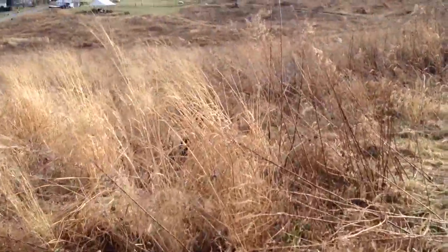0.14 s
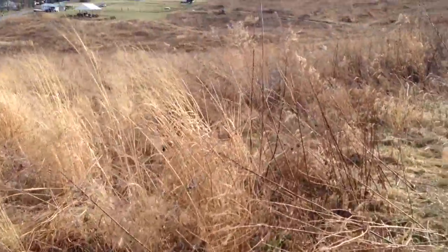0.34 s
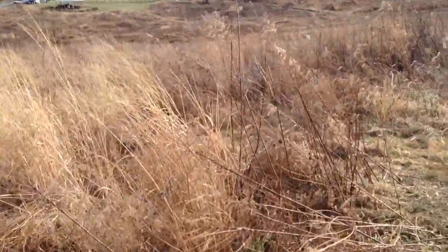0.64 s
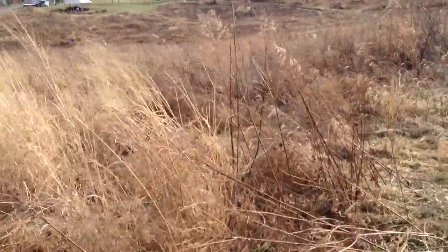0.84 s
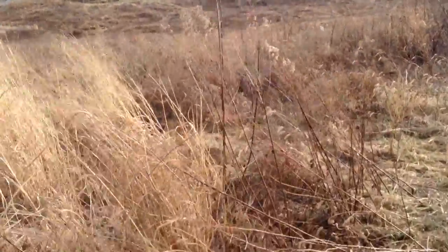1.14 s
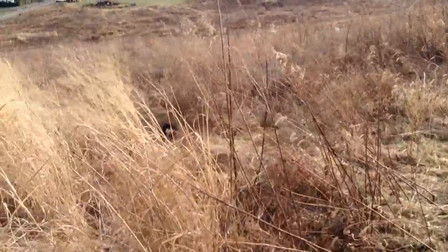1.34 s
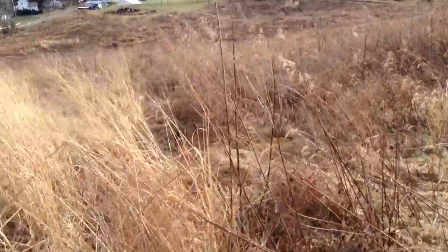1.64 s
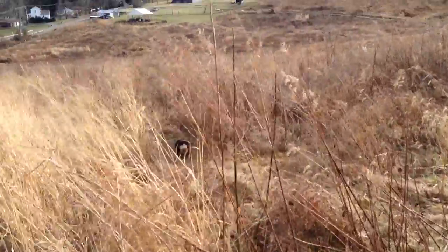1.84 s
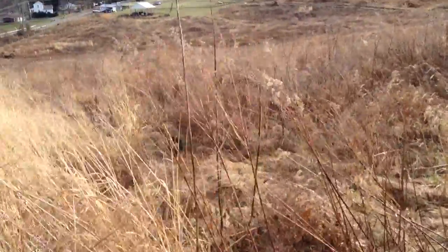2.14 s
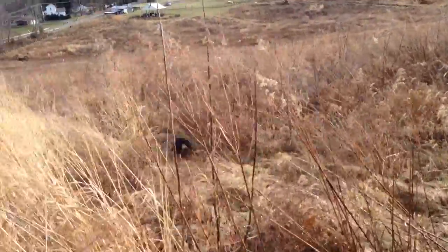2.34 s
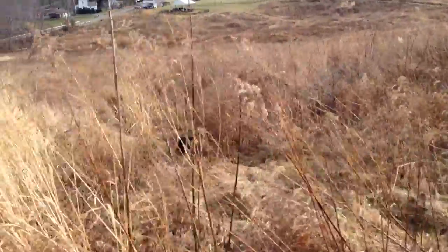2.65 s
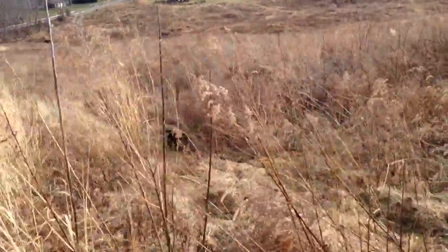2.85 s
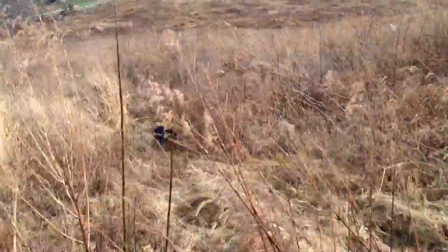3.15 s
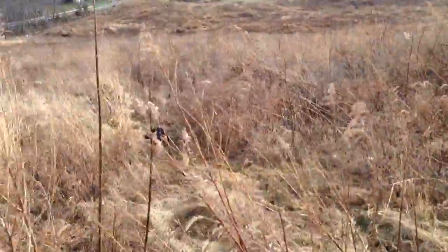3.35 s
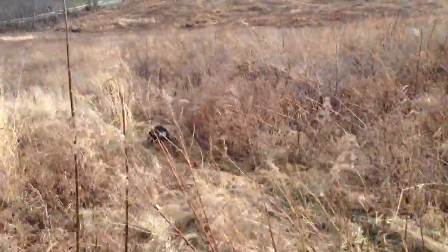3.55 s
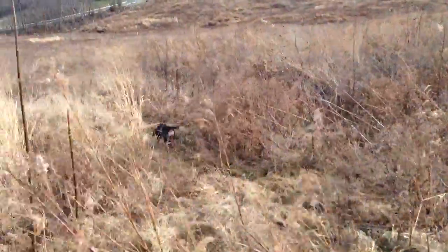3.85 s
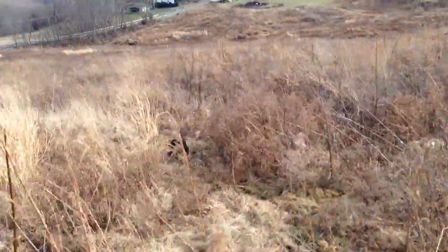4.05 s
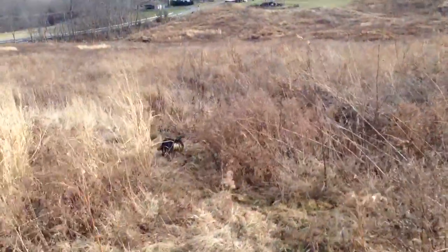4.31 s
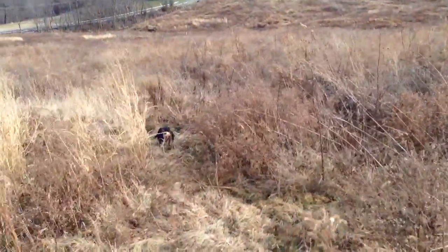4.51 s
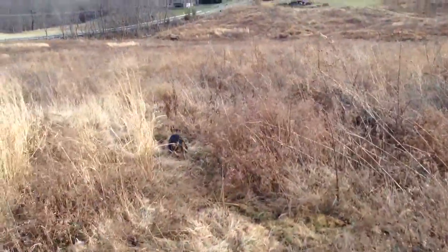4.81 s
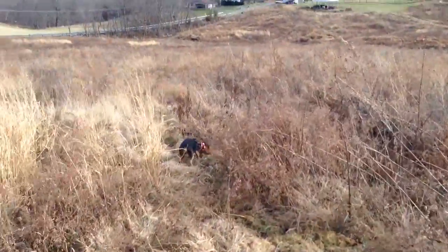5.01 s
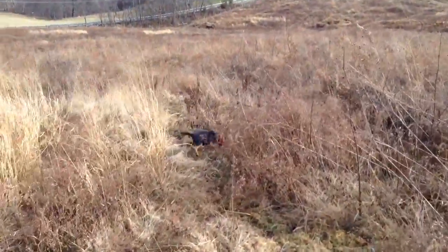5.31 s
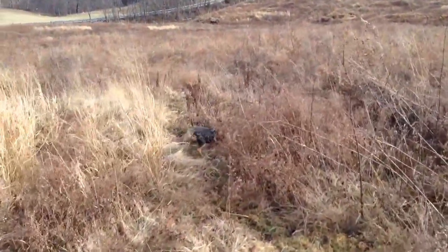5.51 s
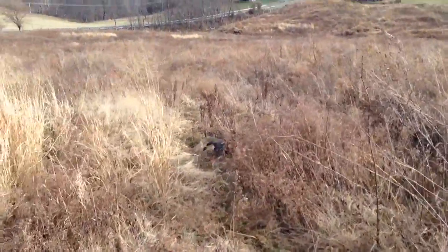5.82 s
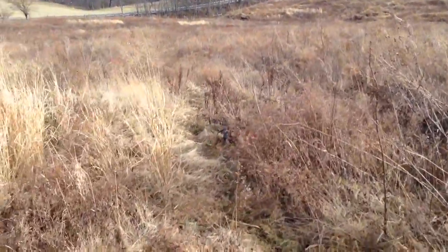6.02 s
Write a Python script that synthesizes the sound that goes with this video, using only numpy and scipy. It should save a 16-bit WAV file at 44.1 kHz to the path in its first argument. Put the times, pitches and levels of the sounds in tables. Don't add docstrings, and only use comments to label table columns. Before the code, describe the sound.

A trailing hound bays nine times, high, hoarse and abrupt, each cry rising quickly, cracking and falling off. Light metallic collar clinks run between and under the cries. Nearby strides brush through brittle grass with crisp snaps and tiny ticks, and dull paw thuds come now and then. Wind puffs low against the microphone, hardest in the gap before the fourth bay. Open, quiet field, dry acoustics.

```python
import sys
import numpy as np
from scipy import signal
from scipy.fft import rfft, irfft
from scipy.io import wavfile
from scipy.ndimage import uniform_filter1d

SR = 44100
rng = np.random.default_rng(int(sys.argv[2]) if len(sys.argv) > 2 else 0)


def level_to_linear(level):
    exponent = np.asarray(level, float) / 20
    return 10 ** exponent


def store_wav(level_fs):
    pcm = np.round(np.clip(np.atleast_2d(level_fs), -1, 1) * 32767)
    wavfile.write(sys.argv[1], SR, pcm.T.astype(np.int16))


N = 272097


def rms_one(x):
    return x / np.sqrt(np.mean(x ** 2) + 1e-20)


def in_time(rows):
    s, *columns = np.transpose(rows)
    t = np.arange(N) / SR
    return [np.interp(t, s, column) for column in columns]


def drift(rate_hz):
    r = np.exp(-2 * np.pi * rate_hz / SR)
    noise = rng.standard_normal(N + SR)
    return rms_one(signal.lfilter([1], [1, -2 * r, r * r], noise)[SR:])


def coloured(x, spectrum):
    hz, level_db = np.transpose(spectrum)
    log_hz = np.log(np.arange(N // 2 + 1) * SR / N + 1)
    gain = level_to_linear(np.interp(log_hz, np.log(hz), level_db, -90, -90))
    return rms_one(irfft(rfft(x) * gain, N))


def resonate(x, hz, width_hz):
    r = np.exp(-np.pi * width_hz / SR)
    return signal.lfilter([1, 0, -1], [1, -2 * r * np.cos(2 * np.pi * hz / SR), r * r], x)


def resonances(x, modes):
    out = 0
    for k, (hz, width_hz, level_db) in enumerate(modes):
        formant = resonate(resonate(x, hz, width_hz), hz, width_hz)
        out = out + (-1) ** k * level_to_linear(level_db) * rms_one(formant)
    return out


def grains(per_s, spread_db):
    sizes = level_to_linear(spread_db * np.minimum(rng.exponential(1, N), 4)) * rng.choice([-1, 1], N)
    return sizes * (rng.random(N) < per_s / SR)


def swells(s, level_db, rising, falling, still_db):
    crown_db = 2.5
    late_s = np.arange(N) / SR - np.c_[s]
    slope = np.where(late_s < 0, np.c_[rising], np.c_[falling])
    each_db = np.c_[level_db] + crown_db - np.hypot(slope * late_s, crown_db)
    return 10 * np.log10(level_to_linear(2 * still_db) + level_to_linear(2 * each_db).sum(axis=0))


# start_s, end_s, widest_db, closing_db_per_s, rest_db (under the folds)
BAYS = [
    (0.339, .755, -31.5, 380, -25),
    (1.015, 1.295, -40.5, 586, -35),
    (1.548, 1.749, -36.5, 211.5, -40),
    (3.106, 3.526, -32, 442.5, -40.5),
    (3.8, 4.013, -32.5, 388, -44.5),
    (4.183, 4.381, -38, 530, -46),
    (4.6, 4.787, -40, 125, -28.5),
    (5.074, 5.266, -35, 397, -44),
    (5.562, 5.749, -30.5, 202, -35.5),
]
# held_s, third_partial_db, roughness_left (share), fifth_partial_db, air_swell_s
GAPES = [(.012, -3, .1, 2, .015), (.015, 2, .2, 2, .011), (.025, -6, .2, 0, .011), (.015, -4, .4, 2, .011),
         (.02, -3, .3, -10, .005), (.04, 2, .3, -2, .011), (.012, -2, .6, 0, .018),
         (.025, 4, .35, -8, .011), (.015, -3, .75, -5, .011)]
# time_s, depth_db, half_width_s
BREAKS = [
    (.433, -12, .005),
    (1.036, -8, .004),
    (1.091, -14, .006),
    (1.694, -14, .008),
    (3.197, -14, .008),
    (3.882, -16, .006),
    (5.161, -8, .006),
]
# time_s, pitch_hz, folds_db, rasp_db
LONG_BAYS = [
    [(.372, 489.9, -24.5, -24.5), (.407, 487.3, -21, -25.5), (.44, 484, -26.5, -31),
     (.495, 517.4, -24, -35.5), (.515, 523, -23, -58.5), (.565, 530.3, -18.5, -61), (.61, 510, -20.5, -68),
     (.685, 503, -27.5, -59.5), (.7, 494, -37.5, -34.5)],
    [(1.045, 490.3, -18.5, -38.5), (1.085, 460.5, -20, -25), (1.105, 527, -17.5, -32),
     (1.165, 489, -26, -29.5), (1.185, 515, -25.5, -47), (1.215, 526, -27.5, -46.5),
     (1.232, 551, -33.5, -37.5), (1.252, 441.3, -36.5, -43)],
    [(3.125, 474.7, -32, -34), (3.151, 512.3, -19.5, -30), (3.193, 482, -16, -29), (3.245, 510.3, -21, -29),
     (3.28, 499.3, -22.5, -70), (3.33, 539, -19, -52), (3.385, 512, -18, -59), (3.45, 528.8, -19.5, -53),
     (3.487, 486, -31.5, -30)],
]
# time_s, pitch_hz, folds_db, rasp_db
SHORT_BAYS = [
    [(1.565, 442.4, -31.5, -32), (1.585, 473.3, -24.5, -26), (1.61, 472, -21.5, -22.5),
     (1.66, 531, -17.5, -28.5), (1.7, 543, -18, -40), (1.725, 539.5, -22, -45), (1.734, 496, -25.5, -32.5)],
    [(3.825, 482, -22, -49.5), (3.853, 493, -21, -37.5), (3.872, 487.5, -17, -21),
     (3.892, 551.3, -19.5, -29), (3.94, 550, -20, -31), (3.975, 502.5, -31, -40)],
    [(4.202, 452, -27.5, -33.5), (4.222, 489, -24.5, -31.5), (4.236, 500.6, -19.5, -34.5),
     (4.265, 485, -27, -39.5), (4.308, 500, -19, -46.5), (4.325, 484.4, -25.5, -30.5),
     (4.355, 455.3, -25.5, -31)],
    [(4.617, 446, -32, -35.5), (4.633, 487, -25.5, -28), (4.692, 498.2, -22, -27.5), (4.706, 503, -28, -26),
     (4.716, 521.6, -20.5, -37.5), (4.755, 525, -24.5, -42.5), (4.766, 510.7, -42, -34.5)],
    [(5.098, 475.3, -25.5, -31.5), (5.118, 519.4, -16, -39), (5.145, 499, -17, -29.5),
     (5.165, 502.7, -21, -27.5), (5.2, 506, -18, -25.5), (5.237, 469.3, -28.5, -31)],
    [(5.578, 445.6, -32, -37.5), (5.605, 513.7, -19.5, -41), (5.635, 497, -19.5, -39),
     (5.66, 507.4, -20.5, -28), (5.68, 522, -18, -25.5), (5.7, 468.6, -26.5, -32.5),
     (5.724, 453.2, -26, -35.5)],
]
# pitch_hz, level_db (over the rasp), onset_db (more at first)
LOOSE_VIBRATION = [(635, -7, 14.5), (614, 1, 11.5), (606, 5.5, 4), (609.7, -3.5, 14), (678, -7, 21),
                   (600, -11.5, 21.5), (589, -1.5, 1.5), (604, -1, 12.5), (609, 0, 4)]
# from_s, first_hz, last_hz, more_db, lateness (exponent of the slide)
TAILS = [(.692, 823, 500, 16, 2.6), (1.216, 770.6, 539.4, 3, 1.5), (1.727, 796, 600, -9, 1.55),
         (3.464, 1040, 430.4, 6, 1.07), (3.961, 792, 479.5, 10.5, 1.5), (4.315, 831, 600, 5, 1.52),
         (4.763, 780, 580, 3.5, 1.09), (5.213, 860.3, 639.5, 3.5, 2.53), (5.688, 936.5, 720, 4, 2.2)]


def throat():
    t, rows = np.arange(N) / SR, []
    for (start, end, *_), inside in zip(BAYS, sorted(LONG_BAYS + SHORT_BAYS)):
        _, last_hz, last_db, last_rasp_db = inside[-1]
        rows += [(start, 444, -40, -32), *inside, (end, last_hz * .88, last_db - 15.5, last_rasp_db - 11.5)]
    hz, folds_db, rasp_db = in_time(rows)

    which = np.maximum(np.searchsorted(np.array(BAYS)[:, 0], t) - 1, 0)
    start, end, widest_db, closing, rest_db = np.array(BAYS)[which].T
    held_s, third_db, left, fifth_db, swell_s = np.array(GAPES)[which].T
    usual_swell_s, shut_db = .01091, -15
    opening_s = .024 * np.sqrt(swell_s / usual_swell_s)
    rest_db = rest_db + .5 * (folds_db + 21)
    age = np.maximum(t - start, 0)
    opening_db = shut_db * (1 - age / opening_s)
    closing_db = -closing * np.maximum(age - opening_s - held_s, 0)
    flung_db = widest_db + np.where(age < opening_s, opening_db, closing_db)
    wide = np.clip((flung_db - folds_db - rest_db) / 8.8, 0, 1)
    unlocked = 2.0 - (1.5 - left) * wide
    open_db = np.maximum(flung_db, folds_db + rest_db)

    loose_rest_hz, over_db, onset_db = np.array(LOOSE_VIBRATION)[which].T
    jump, first_hz, last_hz, tail_db, lateness = np.array(TAILS)[which].T
    catch = np.exp(-np.maximum(age - usual_swell_s, 0) / .02)
    tail = np.clip((t - jump) / .006, 0, 1)
    tail_hz = first_hz + (last_hz - first_hz) * np.clip((t - jump) / (end - jump), 0, 1) ** lateness
    loose_hz = loose_rest_hz * (1 - .07 * catch) + tail * (tail_hz - loose_rest_hz)
    loose_db = rasp_db + over_db + onset_db * catch + tail_db * tail
    loose_db += 11.5 * sum(np.exp(-((t - s) / .0067 + 1) ** 2) for s, *_ in BREAKS)
    return hz, folds_db, rasp_db, loose_hz, loose_db, open_db, third_db, fifth_db, unlocked, tail


# from_s, to_s, level_db (under the first partial)
HALVED = [
    (1.173, 1.207, -36),
    (4.219, 4.328, -22.5),
    (4.699, 4.765, -20),
]
# multiple, level_db, more_db_per_db (of gape)
UPPER_PARTIALS = [(3, 0, .35), (4, -3, 0), (5, -14, -.3), (6, -24, -.5)]
# centre_hz, width_hz, level_db
RASP_MOUTH = [(762, 400, 6), (1085, 580, -4)]
# centre_hz, width_hz, level_db
OPEN_MOUTH = [(1450, 300, 0), (1920, 350, -3), (2550, 600, -9)]
# fold_multiple, loose_multiple, level_db
RASP_LINES = [(-1, 2, -10.5), (-2, 3, -1), (3, -1, -16), (4, -2, 1.5), (1, 1, -19.5), (0, 2, -18.5)]
# fold_multiple, loose_multiple, level_db
OPEN_LINES = [(2, 1, -6), (4, -1, -4), (3, 1, -12), (5, -1, -7), (1, 2, -9), (6, -2, -9)]


def hound():
    t = np.arange(N) / SR
    hz, folds_db, rasp_db, loose_hz, loose_db, open_db, third_db, fifth_db, unlocked, tail = throat()
    rough = unlocked * np.clip(level_to_linear(np.maximum(rasp_db, loose_db - 8) - folds_db + 7.5), 0, 1)
    folds_hz = hz * (1 + .003 * drift(12) + .017 * rough * drift(70))
    folds = 2 * np.pi * np.cumsum(folds_hz) / SR
    loose = 2 * np.pi * np.cumsum(loose_hz * (1 + .02 * drift(50))) / SR

    def waver():
        return level_to_linear(4 * np.tanh(drift(50)))

    def lines(table):
        return sum(level_to_linear(db) * waver() * np.cos(k * folds + m * loose) for k, m, db in table)

    octave_db = folds_db - 0.5 + 0.41 * (open_db - folds_db)
    gape_db = np.clip(open_db - folds_db + 19.0, 0, 14)
    upper = 0
    for k, db, more in UPPER_PARTIALS:
        partial_db = db + more * gape_db + third_db * (k == 3) + fifth_db * (k > 4)
        upper = upper + level_to_linear(partial_db) * np.cos(k * folds + 0.68 * k)
    halved = sum(level_to_linear(db) * np.clip(np.minimum(t - a, b - t) / 0.024, 0, 1) for a, b, db in HALVED)
    half_lines = np.cos(3 * folds / 2) + 0.45 * np.cos(5 * folds / 2)
    clean = level_to_linear(folds_db) * (np.cos(folds) + halved * half_lines)
    clean += level_to_linear(octave_db) * np.cos(2 * folds)
    clean += level_to_linear(open_db) * (1 - 0.78 * rough) * waver() ** rough * upper

    air = rng.standard_normal(N) * (1 + np.cos(folds))
    breath = level_to_linear(-3.5 - 3 * tail) * resonances(air, RASP_MOUTH)
    rasp = level_to_linear(rasp_db - 7.5) * ((1 - .8 * tail) * lines(RASP_LINES) + breath)
    rasp *= unlocked * np.clip(1 - 2.6 * halved / (rough + 0.011), 0, 1)
    loose_tone = np.cos(loose) + level_to_linear(-12.5) * tail * np.cos(folds + loose)
    rasp += level_to_linear(loose_db + 2.0) * waver() ** (1 - .5 * tail) * loose_tone
    open_rasp = lines(OPEN_LINES) + level_to_linear(-7) * resonances(air, OPEN_MOUTH)
    rasp += level_to_linear(open_db + 1 - 4 * np.maximum(unlocked - .5, 0)) * rough * open_rasp

    voice = np.sqrt(2) * level_to_linear(2.5 * rough * np.tanh(drift(90))) * clean + rasp
    voice = signal.sosfilt(signal.butter(6, 395, "high", fs=SR, output="sos"), voice)
    voice += 0.69 * level_to_linear(folds_db) * halved * np.cos(folds / 2)
    sounding = 0
    for (start, end, *_), (*_, swell_s) in zip(BAYS, GAPES):
        sounding = sounding + np.clip((t - start) / swell_s, 0, 1) * (t < end)
    dying = np.prod([np.clip(abs(t - end) / .02, t > end, 1) for _, end, *_ in BAYS], axis=0)
    cracked = level_to_linear(sum(db * np.exp(-((t - s) / w) ** 2) for s, db, w in BREAKS))
    return uniform_filter1d(sounding * dying, size=100) * cracked * voice


def scatter(x):
    t = np.arange(SR // 5) / SR
    delay_s, t60_s = .012, .09
    spray = rng.standard_normal(len(t)) * level_to_linear(-60 * t / t60_s) * (t > delay_s)
    return level_to_linear(-24) * signal.fftconvolve(x, spray / np.linalg.norm(spray))[:N]


# time_s, low_mode_db, middle_modes_db, high_modes_db, t60_s
CLINKS = [(.1708, -52, -58, -66, 0.22), (.242, -66, -51, -66, .2), (.345, -48, -46.5, -41, 0.16),
          (.398, -41, -43.5, -54, 0.1), (0.619, -48, -54, -58, 0.59), (0.736, -38, -50, -51, 0.059),
          (0.826, -46.5, -53, -57, 0.22), (0.9021, -41, -58, -57, 0.14), (0.931, -38.5, -43, -38.5, 0.1),
          (0.999, -42, -50, -58, .49), (1.0265, -47.5, -53, -54.5, 0.43), (1.148, -44, -58, -55, 0.49),
          (1.2457, -42, -48, -61, 0.13), (1.419, -54.5, -47.5, -58, .23), (1.9014, -56, -59.5, -57, 0.26),
          (2.1251, -52, -69, -69, 0.24), (2.396, -48, -58, -52, 0.14), (2.5441, -53, -62, -62, .4),
          (2.5894, -58, -65, -49, 0.29), (2.6894, -62, -66, -52, .2), (2.8093, -50.5, -48, -50, 0.32),
          (2.8686, -53.5, -64, -53, .3), (3.054, -44.5, -45, -56, 0.058), (3.1554, -55, -45, -41.5, .15),
          (3.2081, -60, -59, -62, 0.19), (3.498, -50, -50.5, -54, .28), (3.708, -51, -44.5, -60, 0.77),
          (3.8201, -51, -58, -51, 0.28), (3.8633, -37.5, -55, -51, 0.16), (4.1345, -49, -51, -49, 0.46),
          (4.4356, -44, -53, -52, 0.13), (4.4891, -47.5, -58, -63, 0.22), (4.503, -55, -52, -65, .3),
          (4.63, -52.5, -67, -59, 0.34), (4.7621, -53, -47, -62.5, 0.22), (4.9432, -46, -57, -53, 0.16),
          (5.24, -60, -48.5, -58, 0.31), (5.346, -48.5, -59, -44.5, 0.085), (5.358, -62, -45.5, -53, 0.18),
          (5.868, -66, -50.5, -52, 0.18)]
# pitch_hz, family (0 low, 1 middle, 2 high), level_db, t60_share (of the clink's), own_t60_s
BELL_MODES = [(2902, 0, 0, 0.76, 0.017), (2934, 0, -10.5, 0, 0.0013), (5280, 1, -15.5, .3, .1),
              (6200, 1, -12.5, 0.69, 0.14), (7320, 1, 3, 0.11, 0.079), (9590, 2, -0.5, 0.17, 0.057),
              (10350, 2, -9, 0.31, .07), (10760, 2, -5.5, 0, 0.05), (12450, 2, -7, .1, .09),
              (13400, 2, -14, .1, .06)]


def bell():
    out, t = np.zeros(N + SR), np.arange(SR // 2) / SR
    chance = rng.standard_normal((len(CLINKS), len(BELL_MODES)))
    ticks = rng.standard_normal((len(CLINKS), len(t)))
    for (s, *family_db, t60), luck, tick in zip(CLINKS, chance, ticks):
        ring = level_to_linear(family_db[2] - 4.0) * np.diff(tick, prepend=0) * np.exp(-t / 0.0015)
        for k, (hz, family, mode_db, share, own) in enumerate(BELL_MODES):
            level_db = family_db[round(family)] + mode_db
            level_db += 4 * luck[k] * (k not in (0, 4, 5))
            mode_t60 = np.clip(t60 * share + own, .02, .6)
            ring += level_to_linear(level_db - 60 * t / mode_t60) * np.sin(2 * np.pi * hz * t)
        here = out[round(s * SR):][:len(t)]
        here *= np.exp(-t / .003)
        here += ring
    return out[:N]


# time_s, swish_db, hiss_db, rising_db_per_s, falling_db_per_s
STRIDES = [(0.01, -60, -58, 42, 58), (.68, -62.5, -55, 36, 47), (1.15, -75.5, -59, 37, 80),
           (1.598, -46.5, -47.5, 487, 84), (1.76, -51.5, -51, 102, 64), (2.32, -46, -47.5, 87, 109),
           (2.67, -75, -56, 6.5, 51), (3.24, -51, -51.5, 54, 76), (3.99, -56, -46.5, 44, 47),
           (4.89, -56, -59.5, 35, 26), (5.495, -51, -49, 600, 60), (5.551, -55, -55, 116, 200),
           (5.7, -61.5, -60, 44, 49), (6.039, -58.5, -49.5, 94, 126)]
# frequency_hz, level_db (per Hz)
SWISH = [(700, -8), (1500, -4), (2800, -4), (5000, 2.5), (7500, -1.5), (10000, -9.5), (15000, -2)]
# frequency_hz, level_db (per Hz)
HISS = [(2000, 5), (6000, 10), (9000, 6), (12500, 2.5), (14800, 6), (15400, 9.5)]


def grass():
    s, swish, hiss, rising, falling = np.transpose(STRIDES)
    still_db, steeper = -87, 1.086
    swish_db = swells(s, swish, rising, falling, still_db)
    hiss_db = swells(s, hiss, steeper * rising, steeper * falling, still_db - 2)
    together = 1.5 * drift(18)

    def rubbing():
        return rng.standard_normal(N) + .5 * rms_one(grains(900, 5.3))

    swish = level_to_linear(swish_db + 5.0 + together + 2.0 * drift(37)) * coloured(rubbing(), SWISH)
    hiss = level_to_linear(hiss_db + 2.0 + together + 0.51 * drift(26)) * coloured(rubbing(), HISS)
    top = signal.sosfilt(signal.butter(2, 11000, "high", fs=SR, output="sos"), hiss)
    return swish + hiss + (level_to_linear(2.2 * together[::-1] - 1.5) - 1) * top


# time_s, peak_db, body_db
SNAPS = [(0.2106, -17.5, -61), (0.241, -44, 1), (0.2623, -29.5, -25), (0.321, -38.5, -1),
         (1.575, -33.5, -1), (2.32, -19, -8), (2.441, -39, -6), (2.4748, -28, -19), (2.6762, -21, -56),
         (2.875, -44, -2), (3.4191, -33.5, 3.5), (4.049, -31.5, -23), (4.1429, -12, -14),
         (4.1569, -35.5, 0.5), (4.4329, -50, 6), (4.7033, -19, -8), (5.054, -36, -28), (5.1908, -38, -15),
         (5.5499, -16.5, -22), (1.058, -36, -30), (5.7765, -34.5, -1), (5.8433, -38, -10),
         (5.986, -33, -6.5), (6.122, -37, -22.5)]


def snaps(crack_s=0.00029, splinter_s=0.0062):
    out, t = np.zeros(N + SR), np.arange(2048) / SR
    high = signal.butter(2, [2600, 16000], "band", fs=SR, output="sos")
    body = signal.butter(2, [950, 3400], "band", fs=SR, output="sos")
    for (s, db, body_db), noise in zip(SNAPS, rng.standard_normal((len(SNAPS), len(t)))):
        burst = noise * (np.exp(-t / crack_s) + level_to_linear(-16.5) * np.exp(-t / splinter_s))
        top, low = signal.sosfilt(high, burst), signal.sosfilt(body, burst)
        snap = top / abs(top).max() + level_to_linear(body_db + 1.5) * low / abs(low).max()
        out[round(s * SR):][:len(t)] += level_to_linear(db + 5.0) * snap
    return out[:N]


def knocks(events, octaves, cycles):
    out, t = np.zeros(N + SR), np.arange(4096) / SR
    for (s, db, hz), noise in zip(events, rng.standard_normal((len(events), len(t)))):
        edges_hz = np.clip(hz * 2. ** np.array([-octaves, octaves]), 30, 16000)
        band = signal.butter(2, edges_hz, "band", fs=SR, output="sos")
        burst = signal.sosfilt(band, noise * np.exp(-t * hz / cycles))
        out[round(s * SR):][:len(t)] += level_to_linear(db) * burst / abs(burst).max()
    return out[:N]


# time_s, peak_db, pitch_hz
TICKS = [(1.5389, -47, 1765), (1.7205, -35, 4583), (1.8675, -29.5, 1927), (1.8976, -44, 2930),
         (2.0141, -36.5, 1690), (2.161, -37.5, 2335), (3.3089, -26, 3960), (3.3392, -34, 4060),
         (3.656, -42, 3809), (4.789, -47, 7334), (4.8704, -40, 5543), (5.2949, -33.5, 4940),
         (5.4844, -36, 6230), (5.5316, -28, 5720), (5.6954, -20, 5820), (5.7264, -29, 3710),
         (5.7322, -26, 3826), (5.7556, -31.5, 4700), (5.7756, -32, 2330), (5.8198, -40, 5520),
         (5.8413, -37, 2085), (5.708, -36, 5485), (5.926, -34, 6580),
         (6.8, -36.5, 4900), (5.6625, -37, 3300), (5.739, -34, 4300), (5.1, -27, 5500),
                (5.553, -23, 5600), (2.754, -43, 5000), (5.5495, -12, 13700), (.358, -35, 3200),
                (.411, -41, 2900)]


def stems():
    return knocks(TICKS, octaves=0.43, cycles=7.8)


# time_s, peak_db
THUDS = [(0.851, -40), (.904, -58), (3.59, -41), (3.61, -38.5), (3.674, -35.5), (3.695, -42), (3.735, -55),
         (4.458, -44), (4.561, -42.5), (5.3, -40), (5.378, -50), (3.628, -41.5), (2.441, -41), (4.432, -36),
         (2.562, -27)]


def thuds(decay_s=0.009):
    out, t = np.zeros(N + SR), np.arange(2048) / SR
    dull = signal.butter(2, [180, 750], "band", fs=SR, output="sos")
    for (s, db), noise in zip(THUDS, rng.standard_normal((len(THUDS), len(t)))):
        burst = signal.sosfilt(dull, noise * np.exp(-t / decay_s))
        out[round(s * SR):][:len(t)] += level_to_linear(db) * burst / abs(burst).max()
    return out[:N]


# time_s, level_db, loss_db_per_s (either side)
PUFFS = [(.18, -57, 44), (.77, -46.5, 250), (.88, -44.5, 222), (1.15, -45.5, 113), (1.63, -46.5, 57),
         (1.94, -50, 70.5), (2.2, -49, 45), (2.7, -32.5, 60.5), (3.15, -44, 69), (3.38, -46.5, 105),
         (4.1, -53, 52), (4.6, -59.5, 18), (5.26, -44.5, 243), (5.45, -61, 200), (5.621, -45.5, 63),
         (5.98, -47, 61)]
# frequency_hz, level_db (per Hz)
BUFFET = [(25, -46), (40, -10.5), (58, 3), (86, 0.5), (194, -5.5), (233, -7.5), (552, -23), (700, -33.5),
          (1540, -120)]
# time_s, level_db
GUST = [
    (2.42, -47),
    (2.51, -36),
    (2.6, -36.5),
    (2.665, -40),
    (2.7, -19),
    (2.76, -19.5),
    (2.81, -23.5),
    (2.88, -33.5),
    (2.97, -77),
]
# frequency_hz, level_db (per Hz)
GUST_COLOUR = [(88, -50), (150, -12), (231, 4.5), (350, -7), (401, -2), (674, -12), (1500, -60),
               (1950, -82)]


def wind():
    s, db, loss = np.transpose(PUFFS)
    puffs_db = swells(s, db, loss, loss, -73.5) + 8.7 * np.tanh(drift(22.6))
    buffet = level_to_linear(puffs_db) * coloured(rng.standard_normal(N), BUFFET)
    t = np.arange(N) / SR
    blowing = (t > GUST[0][0]) * (t < GUST[-1][0])
    gust = coloured(grains(1800, 5.1), GUST_COLOUR)
    return buffet + blowing * level_to_linear(in_time(GUST)[0] - 2.0 + 2 * drift(36)) * gust


# time_s, peak_db, pitch_hz
THUMPS = [(1.935, -29.5, 113), (1.8, -31, 115), (2.501, -30, 210), (2.564, -17.5, 129), (2.593, -27.5, 140),
          (2.61, -25, 180), (2.732, -16.5, 223), (2.785, -17, 266), (2.799, -21, 240), (2.851, -26.5, 270),
          (2.935, -34.5, 170), (.742, -26.5, 220), (2.906, -38, 180), (3.2, -27, 240), (2.64, -33, 127),
          (3, -33, 140)]


def eddies():
    return knocks(THUMPS, octaves=0.61, cycles=0.87)


# frequency_hz, level_db (per Hz)
FIELD = [(59, -31), (100, -17), (461, -0.5), (1110, -6.5), (2640, -10.5), (4000, -16), (5200, -42),
         (8800, -120)]


def field():
    return level_to_linear(-59.5 + 4.6 * drift(7.0)) * coloured(rng.standard_normal(N), FIELD)


def scene():
    voice = hound()
    near = voice + scatter(voice) + bell()
    ground = grass() + snaps() + stems() + thuds()
    return (near + ground + wind() + eddies() + field())[None]


def top_cut(x):
    return signal.sosfilt(signal.butter(12, 16640, fs=SR, output="sos"), x)


def record(dry):
    cut = signal.sosfilt(signal.cheby2(8, 22, 15700, fs=SR, output="sos"), dry)
    cut = signal.sosfilt(signal.butter(2, 42, "high", fs=SR, output="sos"), cut)
    return top_cut(cut)


dry = scene()
out = record(dry)
store_wav(out)
```